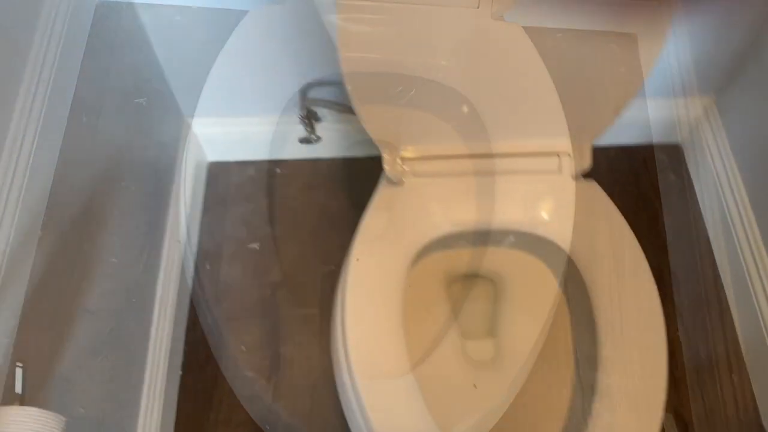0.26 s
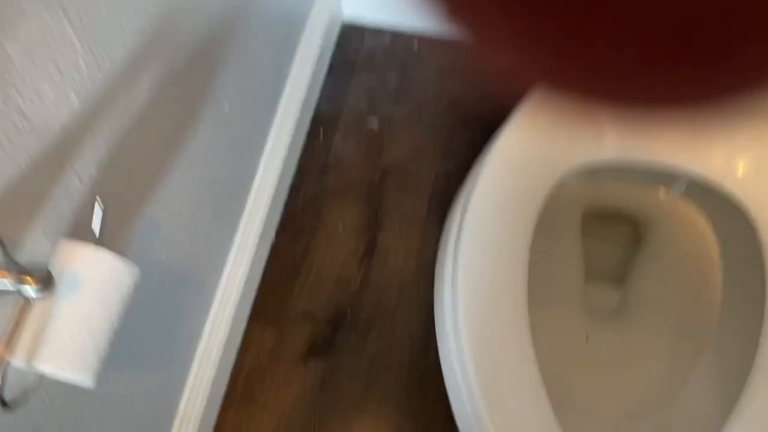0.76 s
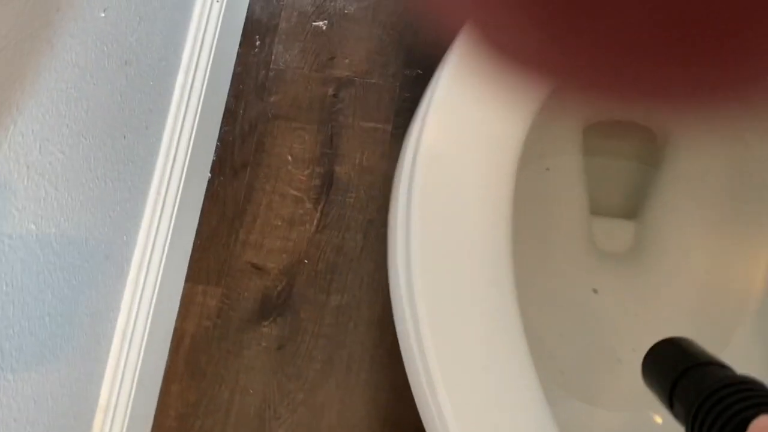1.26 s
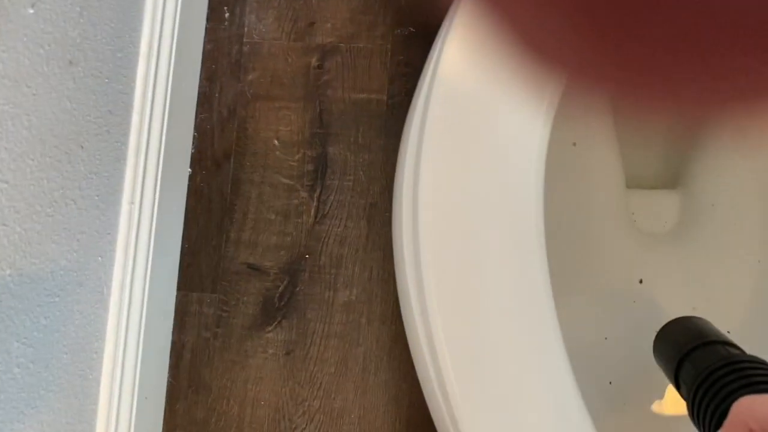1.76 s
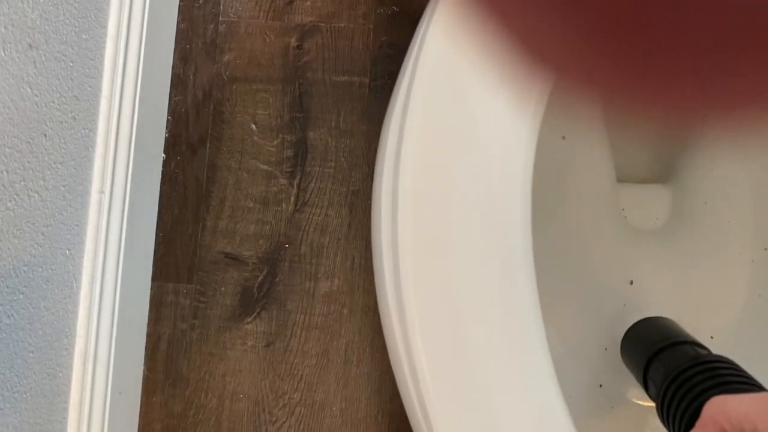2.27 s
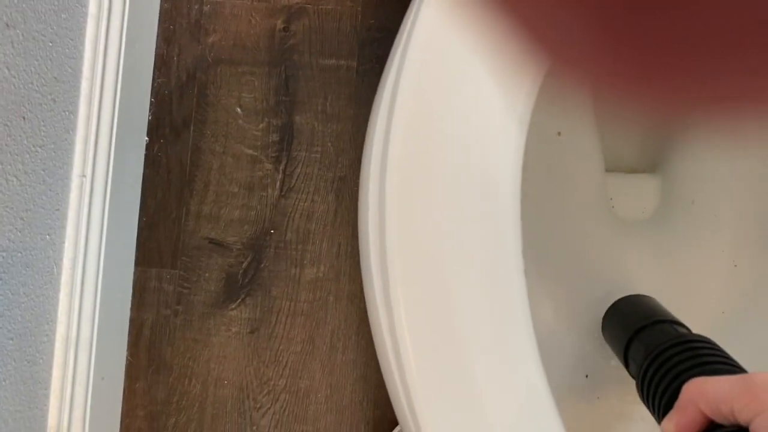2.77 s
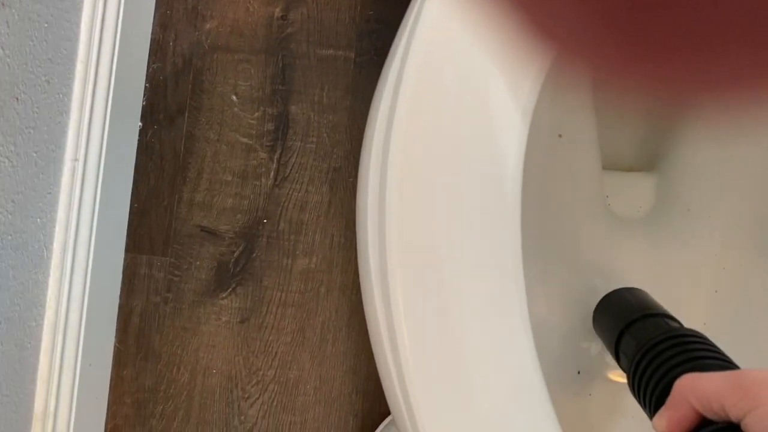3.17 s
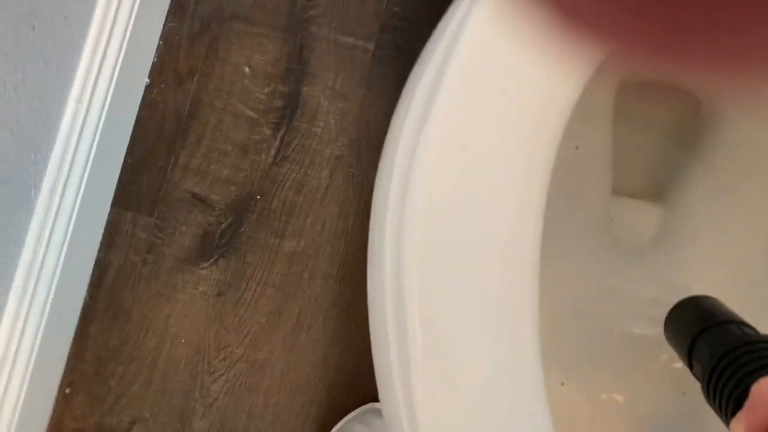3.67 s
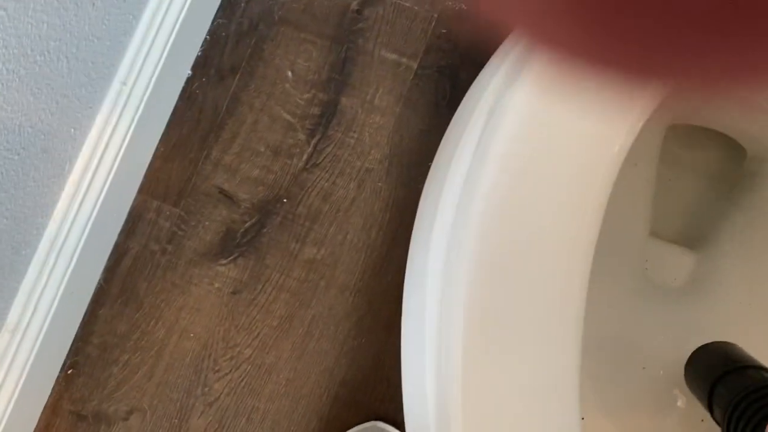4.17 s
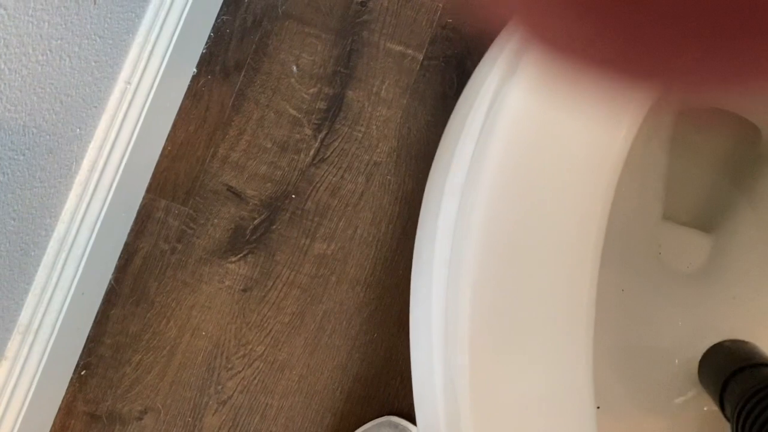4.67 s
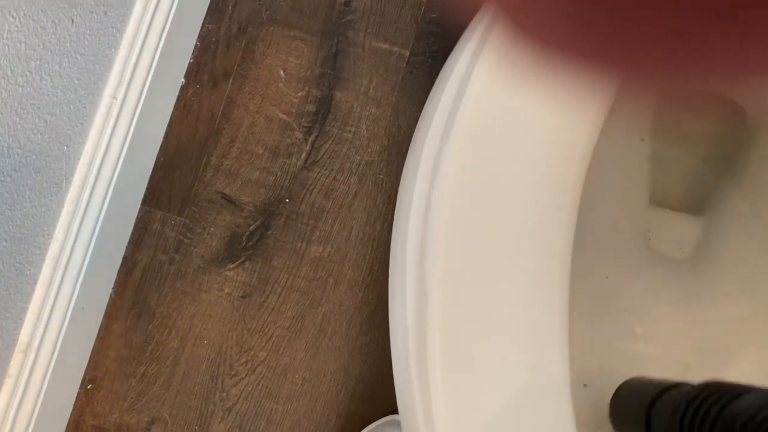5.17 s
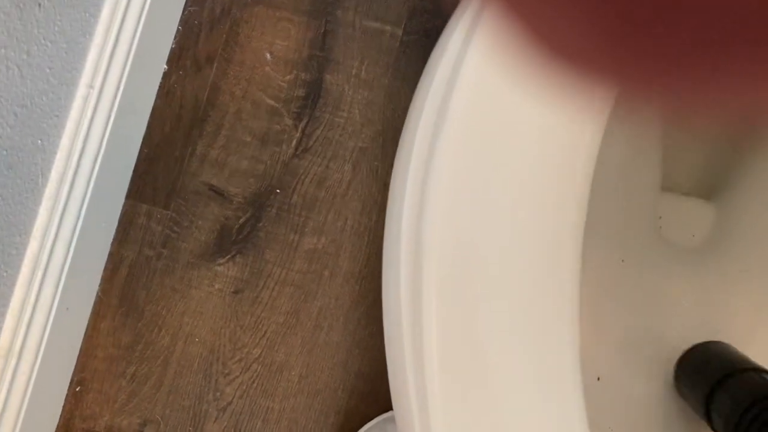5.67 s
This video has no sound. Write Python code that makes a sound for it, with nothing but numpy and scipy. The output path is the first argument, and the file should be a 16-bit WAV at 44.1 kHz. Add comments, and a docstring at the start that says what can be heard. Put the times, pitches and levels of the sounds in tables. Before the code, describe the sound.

Steady vacuum motor roar with a wavering high whine, hollow hoots and watery slurps as a hose sucks a toilet bowl empty.

```python
"""A motor whines over a rush of air, with a hollow roar, hoots, slurps, spray and thumps of water.
A wet and dry vacuum runs in a small bathroom, its hose held in a toilet bowl; the motor speeds up
as water chokes the intake. Whines, hum and whistle are wavering sines; air and water are patchy
noise shaped by colours and resonances; drops are random clicks. Tables time the events."""
import sys
import numpy as np
from scipy import signal
from scipy.fft import rfft, irfft
from scipy.io import wavfile
from scipy.ndimage import uniform_filter1d, map_coordinates

SR = 44100
rng = np.random.default_rng(int(sys.argv[2]) if len(sys.argv) > 2 else 0)


def pcm_store(signal):
    """Save signal as 16-bit PCM."""
    levels = np.round(np.clip(np.atleast_2d(signal), -1, 1) * 32767)
    wavfile.write(sys.argv[1], SR, levels.astype(np.int16).T)


N = 261513
TIME = np.arange(N) / SR

# stereo image, left and right by frequency: f/Hz, likeness/0-1, left lead/rad, left minus right/dB
STEREO = [(100, 1, 0, -.3), (350, .96, -.1, -2.7), (650, .6, .1, -3.5), (1000, .35, -.4, -.3),
          (1800, .87, .1, .3), (2800, .3, 1, -1), (4000, .57, .7, -1.9), (5000, .44, 1.6, -1.2),
          (6900, .7, 2.1, .3), (8000, 1, np.pi, 0), (12000, 1, np.pi, 0), (13700, .45, 4.4, 0),
          (15300, .73, 6, 0)]
# motor shaft speed, rising while water chokes the intake: t/s, turns per second/Hz
SPEED = [(0, 322), (2.05, 323.2), (2.4, 324.6), (3.15, 336.3), (3.6, 337.6), (4.0, 333.4), (4.35, 332.3),
         (4.85, 334.7), (5.15, 334.4), (5.65, 331), (5.93, 331)]
# colour of spray: f/Hz, gain/dB
SPRAY_COLOUR = [(500, -14), (1500, -4), (4000, -2), (6000, 0), (8000, 1), (10000, 2.5), (12000, 0),
                (13700, .5), (15800, -6)]


def gain_of(db):
    """Decibels to amplitude."""
    return 10 ** (np.asarray(db) / 20)


def evened(x):
    """Scales to rms 1."""
    return x / np.sqrt(np.mean(x ** 2) + 1e-20)


def steadied(x, size):
    """Divides out the running rms over size samples: slow surges go, quick flutter stays."""
    return x / np.sqrt(uniform_filter1d((x ** 2).mean(0), size=size) + 1e-9)


def curves(rows):
    """Every column of a time table, sample by sample."""
    s, *columns = np.transpose(rows)
    return [np.interp(TIME, s, column) for column in columns]


def read(points, hz):
    """Every column of a frequency table, on a log axis."""
    f, *columns = np.transpose(points)
    return [np.interp(np.log(hz + 1), np.log(f + 1), column) for column in columns]


def wander(rate_hz):
    """Smooth random motion of rms 1, from two random knots per cycle of rate_hz."""
    knots = rng.standard_normal(1024)
    s = TIME[::64]
    motion = map_coordinates(knots, [s * rate_hz * 2], order=3, mode="wrap")
    return np.interp(TIME, s, evened(motion))


def swell(start_s, rise_s, length_s, release_s, slope_db=0):
    """Envelope of one event: rise, hold sloping by slope_db per second, exponential release."""
    age = TIME - start_s
    hold = gain_of(slope_db * np.clip(age, 0, length_s))
    return np.clip(age / rise_s, 0, 1) * hold * np.exp(-np.maximum(age - length_s, 0) / release_s)


def fade_in_db():
    """The sound fades in over the first half second."""
    start_db, fade_s = -7, 0.54
    return start_db * np.maximum(1 - TIME / fade_s, 0)


def filled():
    """How wet the hose is, 0 to 1."""
    fill_start_s, fill_end_s = 0.37, 2.3
    return np.interp(TIME, (fill_start_s, fill_end_s), [0, 1])


def bins(size):
    """Frequencies of a short-time spectrum."""
    return np.fft.rfftfreq(size, 1 / SR)


def ringing(modes, hz):
    """Gain of a set of resonances, each at half amplitude one width off centre; powers add."""
    power = [gain_of(db) ** 2 / (1 + ((hz - f) / width) ** 2) ** 2 for f, width, db in modes]
    return np.sqrt(sum(power))


def patches(shape, size, span_s, span_hz):
    """A smooth random field over time and frequency, rms 1."""
    field = rng.standard_normal((256, 1024))
    for axis, step in enumerate([size / 4 / SR / span_s, SR / size / span_hz]):
        knot, share = np.divmod(np.arange(shape[axis]) * step, 1)
        knot = knot.astype(int) % (len(field) - 1)
        field = field[knot].T * (1 - share) + field[knot + 1].T * share
    return evened(field)


def turbulence(gain, size, patchy_db, span_s, span_hz):
    """Patchy noise of the given colour in stereo, rms 1."""
    hop = size // 4
    shape = (N // hop + 5, size // 2 + 1)
    a, b, c, d = rng.standard_normal((4, *shape))
    same, lead, balance_db = read(STEREO, bins(size))
    same = np.clip(same, 0, 1)
    left = a + 1j * b
    right = (same * left + np.sqrt(1 - same ** 2) * (c + 1j * d)) * np.exp(-1j * lead)
    z = np.array([left * gain_of(balance_db / 2), right * gain_of(-balance_db / 2)])
    z *= gain * gain_of(patchy_db * patches(shape, size, span_s, span_hz))
    _, noise = signal.istft(z, nperseg=size, noverlap=size - hop, time_axis=1, freq_axis=2)
    return evened(noise[:, :N])


def tone(hz, level_db, fade_db, fade_hz):
    """A line that reflections off the walls fade and shift, more so where the channels differ."""
    angle = 2 * np.pi * (np.cumsum(hz) / SR + rng.random())
    same, lead, _ = read(STEREO, hz.mean())
    apart = np.sqrt(1 - np.clip(same, 0, 1) ** 2)
    fading_db = level_db + fade_db * wander(fade_hz)
    channels = []
    for lag in (0, lead):
        reflections = 0.36 * apart * (wander(fade_hz) + 1j * wander(fade_hz))
        channels.append((1 + reflections) * np.exp(1j * (angle - lag)))
    return np.sqrt(2) * gain_of(fading_db) * np.real(channels)


def flares(rows, rise_s, release_s, size):
    """Short surges, each a burst of noise in one resonance."""
    hz, out = bins(size), np.zeros((2, N + size))
    same, lead, _ = read(STEREO, hz)
    for s, length, centre_hz, width_hz, db in rows:
        left, other = rfft(rng.standard_normal((2, size)))
        right = (same * left + np.sqrt(1 - same ** 2) * other) * np.exp(-1j * lead)
        resonance = ringing([(centre_hz, width_hz, 0)], hz)
        burst = steadied(irfft([left, right] * resonance[None], size), size=1400)
        envelope = swell(0, rise_s, length, release_s)[:size]
        out[:, round(s * SR):][:, :size] += gain_of(db) * burst * envelope
    return out[:, :N]


def motor():
    """Seven impeller blades, eleven fan blades and the shaft follow one speed; the windings hum."""
    # impeller blade whine, swelling and fading: t/s, level before trim/dB
    blade_levels = [(0, -46), (.2, -45), (.37, -29), (.5, -35.5), (.66, -30), (.8, -36), (.93, -41),
                    (1.08, -29.5), (1.2, -37), (1.3, -33.5), (1.52, -39), (1.67, -31), (1.82, -39),
                    (1.95, -36), (2.25, -44), (2.4, -36.5), (2.48, -44), (2.62, -33.5), (2.77, -44),
                    (2.87, -35.5), (3.0, -43), (3.2, -48), (3.67, -50), (3.73, -30.5), (3.86, -34),
                    (4.0, -33.5), (4.08, -40), (4.35, -42), (4.75, -36), (5.04, -31.5), (5.21, -33.5),
                    (5.28, -42), (5.38, -38.5), (5.49, -47), (5.65, -33.5), (5.85, -43)]
    # cooling fan whine: t/s, level before trim/dB
    fan_levels = [(0, -55), (.65, -42.5), (2.2, -47.5), (2.85, -53), (3.08, -38), (3.25, -44),
                  (3.45, -38.5), (3.75, -42), (3.92, -31.5), (4.1, -45), (4.6, -49), (5.2, -45), (5.6, -48),
                  (5.78, -35)]
    # thin top whine, fourth harmonic of the blades: t/s, level before trim/dB
    top_levels = [(0, -46), (.6, -36), (1.45, -40), (1.62, -32), (1.9, -51), (2.7, -53), (2.95, -35),
                  (3.7, -40), (3.95, -44), (4.4, -36), (5.0, -44)]
    # shaft unbalance: t/s, order 1 level before trim/dB, order 2 level before trim/dB
    unbalance_levels = [(0, -52.5, -58), (.65, -32, -61), (2.5, -32, -54), (2.8, -42, -49), (3.5, -39, -46),
                        (3.9, -43, -41), (5.93, -47, -47)]
    # hum of the windings: t/s, level/dB
    hum_levels = [(0, -56.5), (1.4, -44.5), (2.3, -36.5), (3.3, -41.5), (3.8, -40), (4.9, -44), (5.5, -37),
                  (5.93, -40)]
    whine_trim_db, drone_trim_db, hum_hz = -0.24, -1.0, 120
    shaft = curves(SPEED)[0] * (1 + 0.0003 * wander(12))
    whine, drone = 0, 0
    for order, levels in zip((7, 11, 28), (blade_levels, fan_levels, top_levels)):
        whine = whine + tone(order * shaft, curves(levels)[0], fade_db=1.1, fade_hz=14)
    for order, db in zip((1, 2), curves(unbalance_levels)):
        drone = drone + tone(order * shaft, db, fade_db=1.8, fade_hz=6)
    hum = tone(np.full(N, hum_hz), curves(hum_levels)[0], fade_db=2.0, fade_hz=7)
    return gain_of(whine_trim_db) * whine + gain_of(drone_trim_db) * drone + hum


def air():
    """Exhaust rush: coloured noise that thins as the choked motor races."""
    # colour of the rush: f/Hz, gain/dB
    rush_colour = [(30, -23.5), (110, -3.5), (160, 1), (260, 0.5), (450, 2), (700, -2.5), (900, -1),
                   (1400, 1), (2100, 2.06), (2800, 0.24), (3350, 0.5), (3620, 3.5), (3850, 1), (4300, 0.1),
                   (5700, -0.5), (7100, -3.5), (8200, -21.5), (10000, -2.5), (12000, -18), (15500, -32.5)]
    rush_db, choke_db_per_hz = -23.5, -0.0572  # at mean shaft speed; per Hz of shaft speed above it
    colour = gain_of(read(rush_colour, bins(size=4096))[0])
    rush = turbulence(colour, size=4096, patchy_db=2.5, span_s=0.95, span_hz=20)
    shaft = curves(SPEED)[0]
    choke_db = choke_db_per_hz * (shaft - shaft.mean())
    return rush * gain_of(rush_db + choke_db + fade_in_db() + 0.52 * wander(18))


def drum_roar():
    """Air and water buffet the drum: a hollow roar that swells and dips, with quick flutter."""
    # drum resonances: f/Hz, half-width/Hz, peak/dB
    drum_modes = [(218.3, 17, -7), (234.6, 15.3, 2), (299.8, 16.7, 2.5), (315, 14, -8), (357, 12, -2),
                  (377, 11.4, 0.5), (398, 14, -9.5), (450, 23, -11.5)]
    # hollow roar: t/s, level before trim/dB
    roar_levels = [(0, -33), (.29, -37.5), (.4, -32.5), (.7, -30.5), (1.1, -26.5), (1.55, -20.5),
                   (1.7, -21.5), (1.95, -22.5), (2.03, -24), (2.09, -28), (2.16, -26), (2.4, -25),
                   (2.56, -27), (2.68, -24), (2.9, -26.5), (3.45, -26), (3.85, -28), (3.97, -31.5),
                   (4.1, -28), (4.6, -27), (5.5, -27), (5.78, -23.5)]
    trim_db = -1.25
    gain = ringing(drum_modes, bins(size=8192))
    roar = turbulence(gain, size=8192, patchy_db=1, span_s=.25, span_hz=26)
    return steadied(roar, size=3200) * gain_of(curves(roar_levels)[0] + trim_db + 1.63 * wander(28))


def hose_howl():
    """Air howls through the resonances of the hose."""
    # hose resonances: f/Hz, half-width/Hz, peak/dB
    hose_modes = [(445, 10, -2.5), (497, 16, -5), (580.5, 12, -0.5), (632, 13, -0.5), (728.4, 10, -1.5),
                  (778, 12, -4), (854, 16, -13.5), (1002, 12, -10.5), (1057, 7.2, -7)]
    # howl: t/s, level/dB
    howl_levels = [(0, -42), (.6, -37), (1.25, -33.5), (1.55, -33), (1.8, -34), (2.05, -32.5), (2.5, -34),
                   (3.5, -36), (3.9, -35), (4.4, -33.5), (4.72, -34), (4.9, -33.5), (5.4, -34.5),
                   (5.8, -31.5)]
    gain = ringing(hose_modes, bins(size=8192))
    howl = turbulence(gain, size=8192, patchy_db=3.0, span_s=0.2, span_hz=39.14)
    return steadied(howl, size=6000) * gain_of(curves(howl_levels)[0])


def hose_thumps():
    """Slugs of water thump along the hose over a low rumble that grows as the hose fills."""
    # low resonances: f/Hz, half-width/Hz, peak/dB
    slug_modes = [(51.7, 17, -7.5), (80.8, 9.8, 6)]
    # slugs: t/s, length/s, level/dB
    slug_rows = [(.37, 0.053, -38), (0.523, 0.054, -45), (1.29, 0.092, -42), (1.505, 0.056, -34),
                 (2.03, 0.08, -30), (2.228, 0.077, -29), (2.383, .04, -27), (2.478, 0.073, -27),
                 (2.59, 0.088, -26.5), (2.75, 0.043, -30), (2.97, 0.1, -40), (3.56, .12, -38),
                 (3.778, 0.033, -29.5), (4.44, 0.055, -33), (5.165, .06, -30.5), (5.342, 0.2, -33)]
    rise_s, release_s, dry_db, wet_db = 0.042, 0.023, -54.5, -40
    gain = ringing(slug_modes, bins(size=8192))
    thumps = turbulence(gain, size=8192, patchy_db=1.5, span_s=0.76, span_hz=30.3)
    rumble_level = gain_of(dry_db + (wet_db - dry_db) * filled() + 3.0 * wander(5))
    slug_level = sum(gain_of(db) * swell(s, rise_s, length, release_s) for s, length, db in slug_rows)
    return steadied(thumps, size=2600) * np.hypot(rumble_level, slug_level)


def hose_whistle():
    """The ribbed hose sings in the draught: a sine of wavering pitch, faint between its bursts."""
    # bursts: t/s, length/s, level at start/dB
    whistle_rows = [(0, .3, -47), (2.005, 0.06, -34), (2.484, .315, -34), (3.01, 0.08, -36),
                    (4.02, 0.06, -35), (4.2, .05, -38), (4.553, 0.055, -35.5)]
    pipe_hz, drift_rms_hz = 1270, 9.88 * 0.788
    rise_s, release_s, growth_db_per_s, idle_wet_db = 0.02, .018, 14.5, -44
    whistle = tone(pipe_hz + drift_rms_hz * wander(40), 0, fade_db=2.0, fade_hz=35.23)
    singing = sum(gain_of(db) * swell(s, rise_s, length, release_s, growth_db_per_s)
                  for s, length, db in whistle_rows)
    return whistle * np.hypot(gain_of(idle_wet_db) * filled() ** 2, singing)


def draw_levels():
    """Amplitudes of spray, slurp and gap as the nozzle bites into the water; powers add."""
    # draws: t/s, rise/s, length/s, release/s, then levels at start: spray/dB, slurp/dB, gap/dB
    draw_rows = [(1.713, 0.043, 0.063, .03, -45, -33, -44), (1.905, 0.068, 0.88, 0.48, -30, -30.5, -33.5),
                 (3.68, 0.19, 1.05, 0.17, -30, -34, -44), (5.54, 0.032, .39, .5, -27.5, -41, -39)]
    sag_db_per_s = -2
    draws = np.array([swell(*row[:4], sag_db_per_s) for row in draw_rows])
    return np.sqrt(gain_of([row[-3:] for row in draw_rows]).T ** 2 @ draws ** 2)


def droplets(per_s, spread_db):
    """Drops ticking on the hose wall, each a click of its own size in the colour of the spray."""
    hits = rng.random(N) < per_s / SR
    sizes = gain_of(spread_db * np.minimum(rng.exponential(1, N), 4))
    clicks = hits * rng.choice([-1, 1], N) * sizes
    hz = bins(size=N)
    spectrum = rfft(clicks) * gain_of(read(SPRAY_COLOUR, hz)[0])
    _, lead, _ = read(STEREO, hz)
    return evened(irfft([spectrum, spectrum * np.exp(-1j * lead)], N))


def nozzle_spray():
    """Water torn off the surface: bright mist with drops in it; a trickle goes on between draws."""
    idle_db, drops_db = -37.5, -10  # drops relative to mist
    level = np.hypot(draw_levels()[0], gain_of(idle_db + fade_in_db()))
    colour = gain_of(read(SPRAY_COLOUR, bins(size=512))[0])
    mist = turbulence(colour, size=512, patchy_db=1.2, span_s=.03, span_hz=700)
    drops = droplets(per_s=860, spread_db=5.5)
    return (mist + gain_of(drops_db) * drops) * gain_of(.5 * wander(25)) * level


def nozzle_slurp():
    """Water bubbles into the nozzle: very patchy noise; a trickle goes on between draws."""
    # colour of the slurp: f/Hz, gain/dB
    slurp_colour = [(200, -36.5), (550, -12.5), (880, 0.5), (1130, -2.5), (1340, 6.5), (1550, -1.5),
                    (1780, -2.5), (2000, -3), (4000, -15.5), (9000, -41)]
    idle_db = -40.5
    level = np.hypot(draw_levels()[1], gain_of(idle_db + fade_in_db()))
    colour = gain_of(read(slurp_colour, bins(size=1024))[0])
    slurp = turbulence(colour, size=1024, patchy_db=4.5, span_s=.025, span_hz=71.1)
    return slurp * level * gain_of(1.2 * wander(18))


def hoots():
    """Short hollow swells, each in one resonance of the drum or hose."""
    # hoots: t/s, length/s, f/Hz, half-width/Hz, level/dB
    hoot_rows = [(.46, .08, 295, 35, -39), (.74, 0.075, 510, 35, -33.5), (.91, 0.16, 456, 12, -31.5),
                 (1.04, 0.052, 597, 14, -36), (1.08, 0.28, 299, 28, -29), (1.48, .08, 640, 11, -30),
                 (1.6, 0.14, 473, 40, -38), (2.0, 0.12, 560, 100, -34), (2.3, 0.38, 373, 17, -29),
                 (2.6, 0.16, 300, 30, -28), (2.7, 0.07, 616, 35, -34), (2.9, .38, 364, 22, -36),
                 (3.72, 0.35, 660, 25, -40), (4.35, 0.056, 280, 43, -28.5), (4.62, 0.05, 258, 31, -26.5),
                 (4.66, 0.14, 654, 25, -35), (5.58, .06, 300, 33, -28)]
    return flares(hoot_rows, rise_s=0.031, release_s=0.057, size=32768)


def nozzle_gap(size):
    """Air rings in the gap between nozzle and water; the pitch slides with the nozzle depth."""
    # gap resonance: t/s, f/Hz
    gap_pitch = [(2.0, 1770), (2.35, 1670), (2.5, 1620), (2.8, 1570), (5.7, 1720), (5.93, 1810)]
    half_width_hz, hop = 47, size // 4
    frame_s = np.arange(N // hop + 5) * hop / SR
    centre_hz = np.interp(frame_s, *np.transpose(gap_pitch))
    gain = ringing([(centre_hz[:, None], half_width_hz, 0)], bins(size))
    ring = turbulence(gain, size, patchy_db=3.5, span_s=.03, span_hz=60.4)
    return steadied(ring, size=3000) * draw_levels()[2]


def gurgles():
    """Water gurgles at the mouth of the nozzle in short resonant bursts."""
    # gurgles: t/s, length/s, f/Hz, half-width/Hz, level/dB
    gurgle_rows = [(1.73, .07, 1550, 250, -36), (2.035, .04, 1740, 50, -31), (2.13, 0.054, 1400, 130, -36),
                   (2.23, .035, 1450, 200, -32), (2.3, .045, 1730, 80, -39), (2.37, 0.044, 1380, 100, -41),
                   (2.47, .32, 880, 180, -34.5), (2.5, 0.035, 1400, 151, -32.5), (2.7, .09, 1490, 160, -33),
                   (3.0, 0.078, 1500, 250, -32), (4.09, .05, 2280, 150, -30.5),
                   (5.64, 0.04, 2180, 160, -30), (5.7, 0.022, 1720, 60, -37), (5.76, .025, 1350, 150, -31),
                   (5.865, .02, 1300, 110, -32), (5.88, .05, 1770, 40, -29)]
    return flares(gurgle_rows, rise_s=.012, release_s=0.02, size=32768)


def nozzle_gulp():
    """The nozzle lifts to the surface and air tears in: one growing burst of noise."""
    # colour of the gulp: f/Hz, gain/dB
    gulp_colour = [(300, -25), (600, -7), (1000, -2.5), (1600, 1.5), (2100, -0.5), (2300, -3), (2800, -9),
                   (3650, 1.5), (3900, -3), (4400, -0.5), (5500, 1.5), (7200, -6.5), (9500, -5),
                   (15000, -15.5)]
    start_db = -24.5
    colour = gain_of(read(gulp_colour, bins(size=1024))[0])
    gulp = turbulence(colour, size=1024, patchy_db=2, span_s=.03, span_hz=150)
    envelope = swell(start_s=5.53, rise_s=0.03, length_s=0.29, release_s=0.44, slope_db=14.5)
    return gulp * gain_of(start_db) * envelope


def scene():
    """Machine, hose and nozzle together."""
    machine = motor() + air() + drum_roar()
    hose = hose_howl() + hose_thumps() + hose_whistle()
    nozzle = nozzle_spray() + nozzle_slurp() + nozzle_gap(size=2048) + gurgles() + nozzle_gulp()
    return machine + hose + hoots() + nozzle


def record(dry):
    """Limits the band with a steep linear-phase low-pass."""
    edge_hz = 15850
    low_pass = signal.firwin(511, edge_hz, window=("kaiser", 9), fs=SR)
    return signal.oaconvolve(dry, low_pass[None], "same")


dry = scene()
out = record(dry)
pcm_store(out)
```